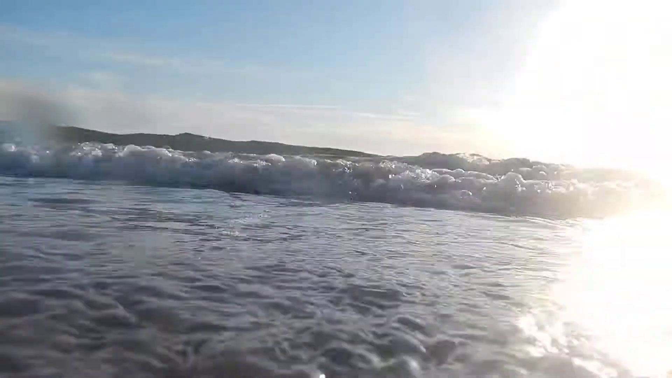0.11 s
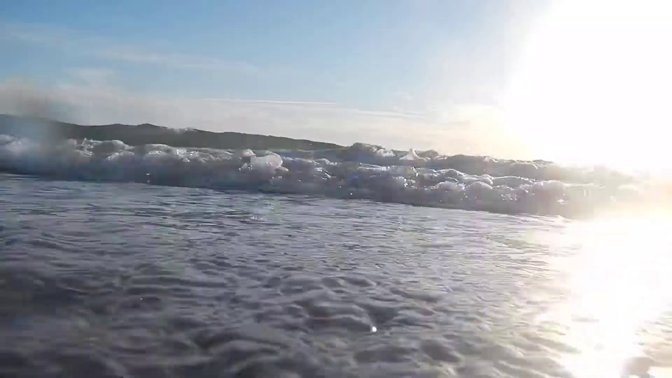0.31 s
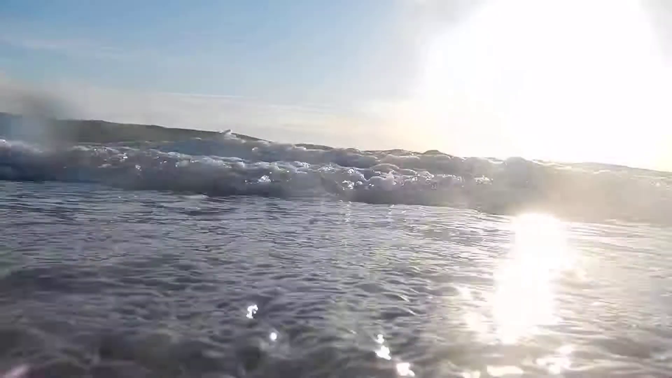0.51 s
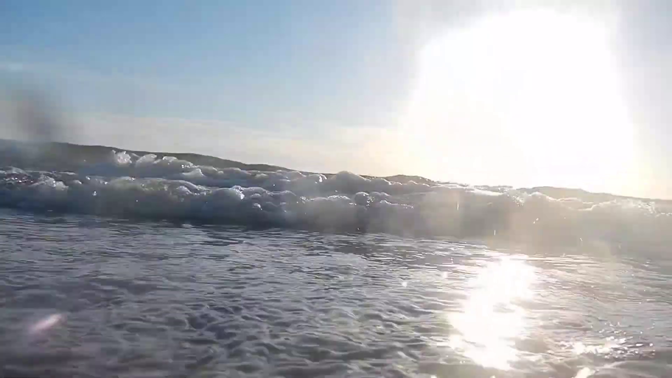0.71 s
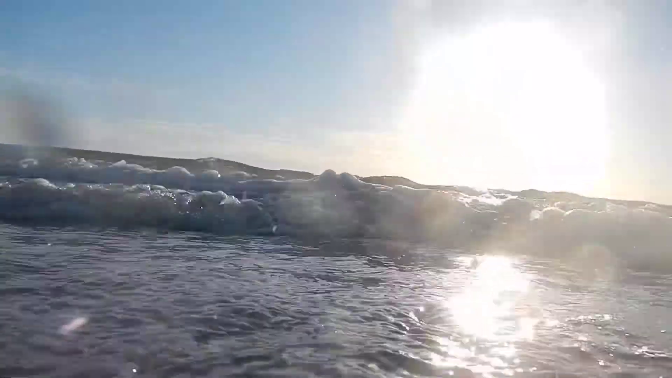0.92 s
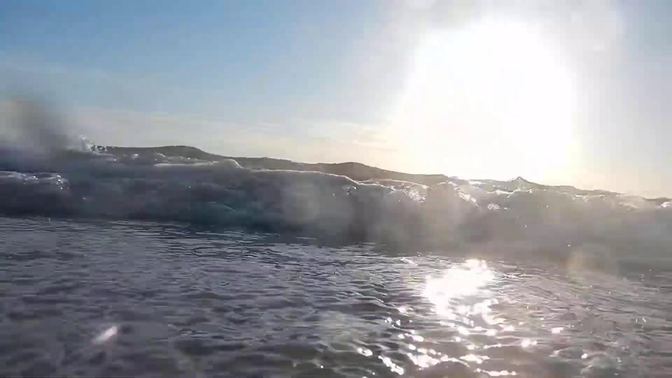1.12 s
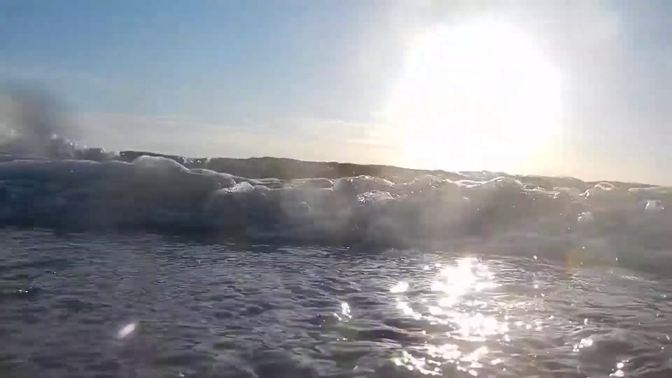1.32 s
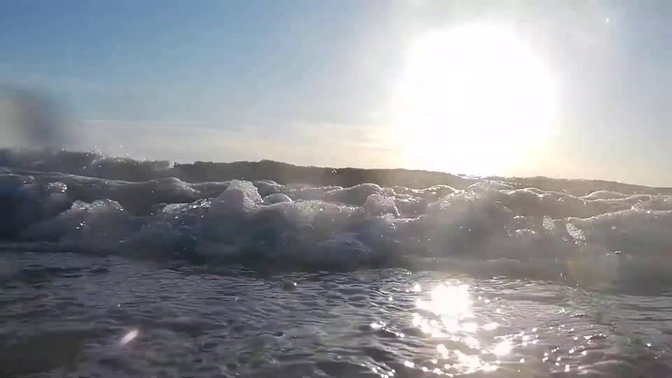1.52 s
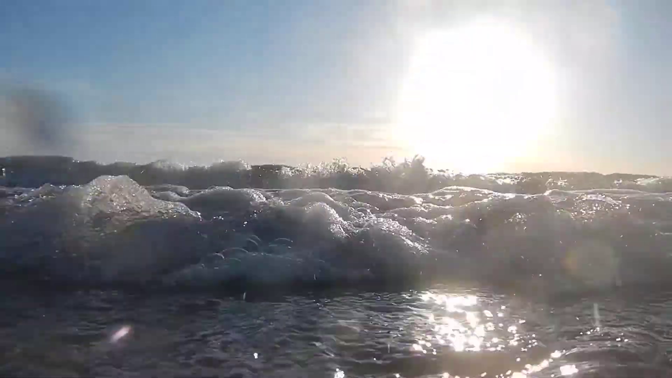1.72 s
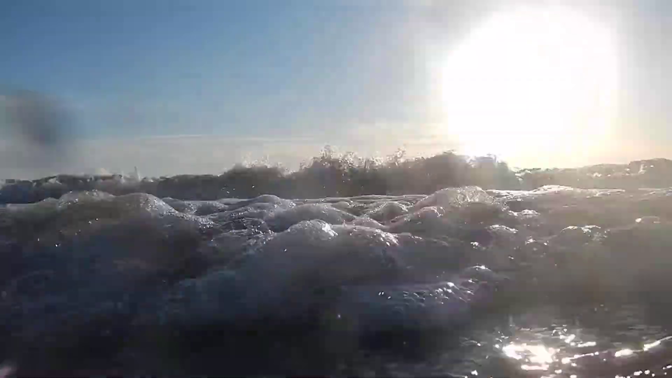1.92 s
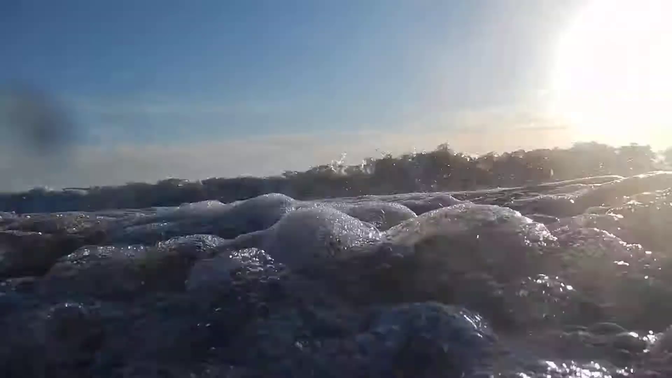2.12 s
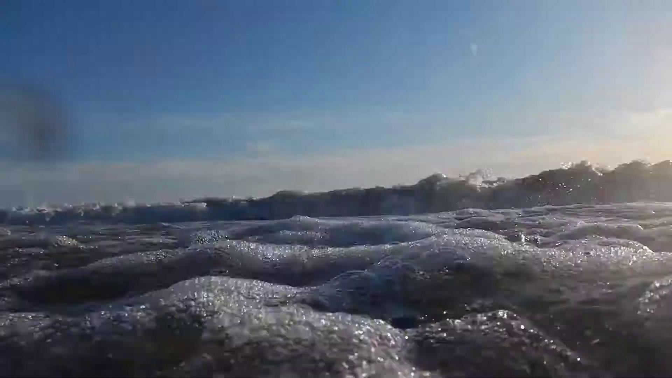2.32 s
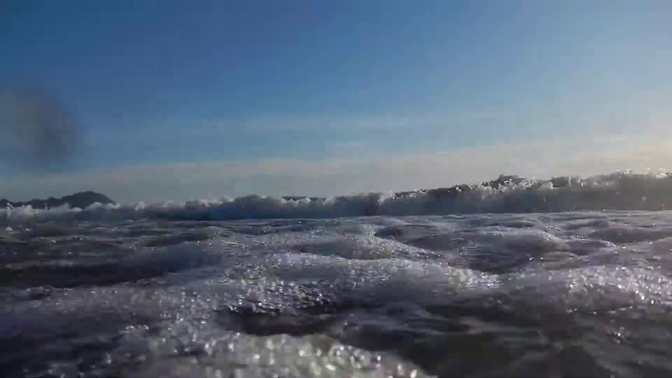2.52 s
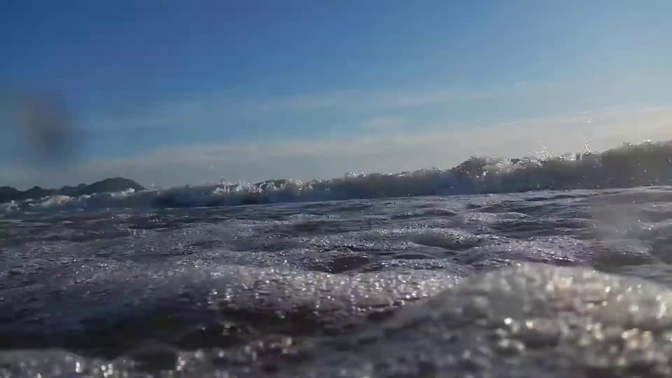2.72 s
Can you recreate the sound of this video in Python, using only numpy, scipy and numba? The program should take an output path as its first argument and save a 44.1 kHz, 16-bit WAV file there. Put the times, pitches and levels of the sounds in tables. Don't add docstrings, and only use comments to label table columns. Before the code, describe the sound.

Foamy wave wash heard up close through a housing, gurgling and popping, then abruptly muffled as water covers it

```python
import sys
import numpy as np
from scipy import signal
from scipy.io import wavfile
from scipy.ndimage import uniform_filter1d
from numba import njit

SR = 44100
rng = np.random.default_rng(int(sys.argv[2]) if len(sys.argv) > 2 else 0)


def transcribe(u):
    v = np.clip(np.atleast_2d(u).T, -1, 1)
    q = np.round(v * 32767).astype(np.int16)
    wavfile.write(sys.argv[1], SR, q)


def field_ratio(decibels):
    return 10 ** (np.asarray(decibels, dtype=float) / 20)


N = 121275
T = np.arange(N) / SR


@njit
def svf(x, hz, width):
    y, band, low = np.empty((2, len(x))), 0., 0.
    for i in range(len(x)):
        g, k = np.tan(np.pi * hz[i] / SR), width[i] / hz[i]
        v = (band + g * (x[i] - low)) / (1 + g * (g + k))
        y[0, i], y[1, i] = k * v, low + g * v
        band, low = 2 * v - band, low + 2 * g * v
    return y


def ring(x, hz, width_hz):
    return svf(x, hz + 0 * T, width_hz + 0 * T)


def fixed(x, hz, width_hz):
    b, a = signal.iirpeak(hz, hz / width_hz, fs=SR)
    return signal.lfilter(b, a, signal.lfilter(b, a, x))


def steep(x, hz, kind):
    return signal.sosfilt(signal.butter(6, hz, kind, fs=SR, output="sos"), x)


def band_noise(x, order, low_hz, high_hz):
    return signal.sosfilt(signal.butter(order, [low_hz, high_hz], "band", fs=SR, output="sos"), x)


def unit(x):
    return x / np.sqrt(np.mean(x ** 2))


def walk(rate):
    k = int(SR / rate)
    steps = np.repeat(rng.standard_normal(N // k + 1), k)
    return unit(uniform_filter1d(uniform_filter1d(steps, k), k)[:N])


def foam(grain_db, flicker_db):
    return unit(rng.standard_normal(N) * field_ratio(grain_db * walk(300) + flicker_db * walk(24.74)))


# t/s, level/dB, right port f/Hz, left port f/Hz, right port ring/dB
WASH_COURSE = [(0, 6, 941, 1406, -1), (.9, 0, 983, 1456, 3.5), (1.02, 0.5, 940, 1355, -0.5),
               (1.12, -1.5, 976, 1436, -1.5), (1.27, -3, 964, 1396, -0.5), (1.32, -0.5, 947, 1400, 1),
               (1.55, 0, 1020, 1370, -2.5), (1.635, -1, 1179, 1390, 3.5), (1.66, 0.5, 1456, 1580, -6),
               (1.9, 0.5, 2140, 1750, 0.5), (2.05, 1.5, 1670, 1750, -7), (2.12, 0.5, 1230, 1610, -8.5),
               (2.33, 2, 1130, 1580, -3), (2.37, 0.5, 1270, 1800, 6.5), (2.42, 1, 1253, 1630, 4),
               (2.5, 2.5, 860, 1310, -8.5), (2.6, 1.5, 770, 1300, -12), (2.75, -4.5, 870, 1200, -7)]


def wash():
    columns = np.array(WASH_COURSE).T
    level_db, right_hz, left_hz, ring_db = (np.interp(T, columns[0], c) for c in columns[1:])
    boost_db, bass_db, treble_db, crackle = sloshes()
    out = ports(right_hz, left_hz, ring_db, bass_db, crackle)
    out = out + shell(left_hz, treble_db, crackle) + rumble(bass_db)
    return out * field_ratio(level_db + boost_db)


# t/s, length/s, boost level/dB, extra bass level/dB, extra treble level/dB
SLOSHES = [(0.634, 0.015, 2, 4.5, 0.5), (0.746, 0.047, 2.5, -9, 1), (1.09, .2, 0.5, 1.5, -1),
           (1.116, .035, 0, 0.5, 7), (0.417, .025, 1.5, -2.5, 5.5), (1.482, 0.081, 2, 1, -3.5),
           (1.618, 0.023, 0, 1, 7.5), (1.643, 0.021, 1.5, 0.5, 16), (2.338, 0.176, -0.5, 2, 9),
           (2.361, .013, 3, -4, 2.5), (2.369, .011, 8, -21, -8), (2.382, 0.0087, 6, -4, -4.5),
           (2.397, 0.023, -3.5, 4, 3), (2.426, 0.032, 2, 3.5, -1.5), (2.461, 0.035, -0.5, 4.5, -4.5),
           (2.524, 0.018, 11.5, 7, -1), (2.656, 0.065, 2.5, 2, -1), (2.692, 0.013, 2.5, 6, 2.5)]


def sloshes():
    shape = [uniform_filter1d(1. * ((T > row[0]) & (T < row[0] + row[1])), size=160) for row in SLOSHES]
    boost_db, bass_db, treble_db = (sum(e * row[k] for e, row in zip(shape, SLOSHES)) for k in (2, 3, 4))
    crackle = field_ratio(1.79 * walk(150) * np.minimum(sum(shape), 1))
    return boost_db, bass_db, treble_db, crackle


APART_DB, CUT_HZ = -6, 373
BODY_HZ, BODY_WIDTH_HZ = 398, 252
LEFT_Q, RIGHT_Q = 7.5, 5.8
LEFT_BODY_DB, LEFT_PORT_DB, RIGHT_DB = -2.5, 3, -7.5
LEAK_TO_LEFT_DB, LEAK_TO_RIGHT_DB = -8.5, -5
TOP_HZ = (1750, 1910)


def ports(right_hz, left_hz, ring_db, bass_db, crackle):
    shared = foam(0.31, 0.32)
    left_in, right_in = (steep(crackle * (shared + field_ratio(APART_DB) * foam(0.4, 0.55)), CUT_HZ, "high")
                         for _ in range(2))
    left_port = ring(left_in, left_hz, left_hz / LEFT_Q)
    right_port = ring(right_in, right_hz, right_hz / RIGHT_Q / field_ratio(ring_db))
    left_body = ring(left_in, BODY_HZ, BODY_WIDTH_HZ)[0]
    right_body = ring(right_in, BODY_HZ, BODY_WIDTH_HZ)[0]

    left = field_ratio(LEFT_BODY_DB + bass_db) * left_body
    left += field_ratio(LEFT_PORT_DB + 0.85 * ring_db) * left_port[0]
    left += field_ratio(LEAK_TO_LEFT_DB + ring_db) * right_port[0]
    right = field_ratio(RIGHT_DB) * (right_port[1] + field_ratio(bass_db) * right_body)
    right += field_ratio(LEAK_TO_RIGHT_DB) * left_port[0]

    edge = [ring(x, hz * np.maximum(left_hz / 1450, 1), 1.636 * hz)[1] for x, hz in zip((left, right), TOP_HZ)]
    return steep(np.array(edge), 1742, "low") * field_ratio(11)


# f/Hz, width f/Hz, left level/dB, right level/dB
SHELL_MODES = [
    (2630, 340, -26, -23),
    (3000, 591, -25, -34),
    (3700, 440, -25.5, -33),
    (5160, 830, -37, -40.5),
    (5730, 1200, -43.5, -43),
    (9430, 4800, -57, -55.5),
]
DUNK_S, DUNK_DB_PER_KHZ = 1.645, -2.4


def shell(left_hz, treble_db, crackle):
    out = np.zeros((2, N))
    muffle_db = 13 * np.log2(np.minimum(left_hz / 1450, 1)) + treble_db
    for hz, width_hz, *side_db in SHELL_MODES:
        dunk_db = DUNK_DB_PER_KHZ * (T > DUNK_S) * np.clip(hz - 2900, 0, 2600) / 1000
        fizz = rng.standard_normal((2, N)) * field_ratio(0.69 * walk(39.71) + dunk_db + muffle_db) * crackle
        fizz[1] -= 0.24 * fizz[0]
        out += field_ratio(np.array(side_db)[:, None] + 11.5) * fixed(fizz, hz, 1.47 * width_hz)
    return out


RUMBLE_HZ, RUMBLE_DB = (62.5, 125, 224), (-25, -19.5, -25)


def rumble(bass_db):
    out = np.zeros((2, N))
    for hz, level_db in zip(RUMBLE_HZ, RUMBLE_DB):
        low = [unit(fixed(foam(0, 3.1), hz, hz * 0.95)) for _ in range(3)]
        out += field_ratio(level_db + bass_db) * (low[0] + field_ratio(-10) * np.array(low[1:]))
    return out


def add(out, s, x, db, pan_db):
    i = int(s * SR)
    side_gain = field_ratio(db + np.array([[pan_db / 2], [-pan_db / 2]]))
    out[:, i:i + x.shape[1]] += (x / np.abs(x).max() * side_gain)[:, :N - i]


# t/s, peak level/dB, f/Hz, ring/ms, left-right
# level/dB
RINGING_BUBBLES = [(0.308, -25, 2680, 2.8, -5.5), (.432, -33, 2810, 3.8, -6),
                   (0.453, -20.5, 1760, 4.7, -13), (0.559, -16.5, 5235, 4.3, -3.5),
                   (.597, -36.5, 7570, 3, 2.5), (0.638, -17, 3220, 10, -4), (0.641, -18.5, 2360, 3.4, -12),
                   (.659, -14.5, 2706, 2.3, 5.5), (.661, -18, 3700, 5.2, 13), (0.693, -5.5, 1782, 5.7, -3),
                   (.730, -26, 5000, 5.3, 1), (.814, -24, 2770, 2.4, 0), (.863, -7.5, 1440, 8.3, 1),
                   (.863, -12, 1010, 10.2, -16), (0.874, -14, 5010, 2.2, 14), (0.874, -19.5, 2740, 3.9, -1),
                   (.855, -29, 8000, 3.3, 8), (.923, -2.5, 1647, 5.3, -2), (1.244, -32, 4970, 4, -8.5),
                   (1.378, -23.5, 2107, 1.5, -4.5), (2.06, -17.5, 1570, 2.6, 18), (2.436, -5, 2760, 3, 0.5),
                   (1.023, -12.5, 930, 10, -15), (1.058, -16, 935, 8, -9), (1.092, -12, 767, 8, -10),
             (1.133, -14.5, 980, 10, -17), (1.161, -14, 955, 7, -16), (1.18, -9, 966, 10, -9),
             (1.201, -10, 835, 9, -16), (1.227, -9, 952, 14, -16.5), (1.276, -11, 1500, 6, -6),
             (1.277, -7.5, 990, 8, -12), (1.288, -10.5, 1546, 6, -0.5), (1.289, -15, 990, 7, -13),
             (1.385, -20.5, 1620, 5, -4), (1.386, -32.5, 2800, 4, -2), (1.452, -20.5, 1680, 4, 5),
             (1.158, -34, 5550, 4, 2), (2.198, -24.5, 1270, 4, 13), (2.361, -27, 3970, 4, 2),
             (2.365, -22.5, 2480, 5, -6), (2.441, -16, 361, 16, -19), (2.44, -22, 176, 28, -13),
             (2.655, -35, 796, 17, 2), (2.453, -36, 3300, 4, -1), (2.467, -33, 845, 6, -3),
             (2.53, -31, 173, 17, -10)]
# t/s, peak level/dB, f/Hz, ring/ms, left-right level/dB
SINKING_PLOPS = [
    (.577, -16.5, 3620, 9.9, 0),
    (.578, -22, 2550, 8, -2),
    (.589, -20, 2570, 7.9, -13.5),
    (.589, -23.5, 3530, 16, 3),
    (.696, -23, 3400, 5.1, 2),
    (.66, -34, 4840, 5, -1),
]
GLIDE, SINK = .02, -0.066
ROUGH, RISE_CYCLES = .55, 1.77


def bubbles():
    out, t = np.zeros((2, N)), T[:4000]
    events = [(row, False) for row in RINGING_BUBBLES] + [(row, True) for row in SINKING_PLOPS]
    for (s, db, hz, ms, pan_db), sinks in events:
        u = t * 1000 / ms
        rise = np.sin(np.pi / 2 * np.minimum(t * hz / RISE_CYCLES, 1)) ** 2
        env = rise * np.exp(-u ** (3.5 if sinks else 1.5) * 1.67)
        bend = SINK * u if sinks else GLIDE * (u - 1)
        side_phase = np.array([[0], [hz / 1900]])
        tone = np.sin(2 * np.pi * hz * t * (1 + bend / 2) + side_phase)
        spray = unit(band_noise(rng.standard_normal((2, len(t))), 4, hz * 0.46, hz * 1.09))
        rough = ROUGH * min(hz / 2500, 1) * spray * np.exp(-u)
        add(out, s, env * (tone + rough), db, pan_db)
    return out


# t/s, peak level/dB, port ring f/Hz, left-right level/dB
PORT_SLAPS = [(.6393, -13, 1300, -10), (1.0425, -15, 950, -0.5), (1.2775, -13.5, 1185, -6),
              (1.29, -24, 1270, -17), (1.6388, -17.5, 1620, 24.5), (2.3721, -18.5, 1470, -19),
              (2.379, -22, 1487, -16), (2.426, -10.5, 1240, -24.5), (2.4344, -19, 2150, 17),
              (2.4891, -15, 1187, -17), (2.5258, -25, 800, -26)]


def slaps():
    out, t = np.zeros((2, N)), T[:4000]
    for s, db, hz, pan_db in PORT_SLAPS:
        rise = np.sin(np.pi / 2 * np.minimum(t * hz * 3, 1)) ** 2
        decay = np.exp(-t * hz)
        add(out, s, -np.sin(2 * np.pi * hz * t)[None] * rise * decay, db, pan_db)
    return out


# t/s, peak level/dB, brightness f/Hz, left-right level/dB
DROP_TICKS = [(.421, -28, 2500, 2), (.453, -38, 6500, 0), (.559, -26, 3000, 0), (.635, -31, 4500, 3),
              (.692, -20, 3200, -4), (.693, -35, 8500, 0), (.855, -34, 5500, 0), (.873, -15, 4200, 0),
              (.874, -31, 7500, 0), (1.132, -27, 8500, 1), (1.133, -30, 4000, 0), (1.232, -31, 6500, 0),
              (1.276, -29, 3500, -5), (1.439, -39, 6800, 0), (1.638, -18, 6000, 3), (1.638, -29, 11000, 0),
              (1.277, -36, 10500, 0), (2.490, -36, 10500, 0), (1.628, -33, 6000, 0), (2.059, -36, 3000, 8),
              (1.659, -46, 7500, 0), (1.668, -50, 6500, 0), (2.196, -37, 4000, 4), (2.342, -32, 5500, 0),
              (2.411, -43, 7000, 0), (2.435, -12, 3000, 3), (2.435, -42, 11000, 0), (2.503, -48, 9000, 0),
              (2.489, -29, 5000, -3), (2.426, -40, 8000, -4), (2.541, -39, 4200, 0), (2.372, -45, 9000, 0)]
TICK_S = .0005


def ticks():
    out, t = np.zeros((2, N)), T[:4000]
    for s, db, hz, pan_db in DROP_TICKS:
        burst = rng.standard_normal((2, len(t))) * (t / TICK_S) * np.exp(-t / TICK_S)
        burst[1] += .5 * burst[0]
        add(out, s, band_noise(burst, 3, hz * .5, hz * 1.27), db, pan_db)
    return out


THUMP_S, THUMP_DB, THUMP_HZ, THUMP_DECAY_S = 2.202, -25.5, 72.6, 0.00615


def thump():
    out, t = np.zeros((2, N)), T[:5000]
    pulse = -np.sin(2 * np.pi * THUMP_HZ * t) * t * np.exp(-t / THUMP_DECAY_S)
    add(out, THUMP_S, pulse[None], THUMP_DB, 13)
    return out


# on t/s, off t/s, level/dB
WHINE_SPANS = [
    (0, 1.625, -55),
    (1.87, 2.38, -62),
]
WHINE_HZ = 14836


def whine():
    level = sum(field_ratio(db) * ((T >= on) & (T < off)) for on, off, db in WHINE_SPANS)
    return level * field_ratio(1.5 * walk(30)) * np.sin(2 * np.pi * WHINE_HZ * T)


# t/s, drop level/dB, recovery after it in dB/s
GAIN_DUCKS = [
    (0, 2, 23.5),
    (0.696, 6, 24.5),
    (1.278, 7.5, -2),
    (1.295, 7, 27),
    (1.641, 20, 17),
    (2.496, 19, 1.5),
    (2.548, 1, 31.5),
]
START_DB, DUCK_S = -34, 0.0026


def gain_db():
    ends = [row[0] for row in GAIN_DUCKS[1:]] + [T[-1]]
    gain = START_DB
    for (s, drop_db, rate), end in zip(GAIN_DUCKS, ends):
        recovery = rate * np.clip(T - s, 0, end - s)
        gain = gain + recovery - drop_db * np.clip((T - s) / DUCK_S, 0, 1)
    return gain


def scene():
    return (wash() + whine()) * field_ratio(gain_db()) + bubbles() + slaps() + ticks() + thump()


QUIET_HZ, QUIET_DB, QUIET_DB_PER_KHZ, FRAME_LEAD = 4700, -98.5, .8, 471


def quiet(x):
    hz, _, z = signal.stft(np.pad(x, ((0, 0), (FRAME_LEAD, 0))), SR, nperseg=2048)
    hz = hz[:, None]
    threshold = field_ratio(QUIET_DB + QUIET_DB_PER_KHZ * (hz - QUIET_HZ) / 1000)
    keep = (np.abs(z) > threshold) | (hz < QUIET_HZ) | (np.abs(hz - WHINE_HZ) < 45)
    return signal.istft(z * keep, SR, nperseg=2048)[1][:, FRAME_LEAD:FRAME_LEAD + N]


def band_limit(x):
    return signal.sosfilt(signal.butter(12, 16470, fs=SR, output="sos"), x)


def record(dry):
    limited = np.tanh(dry * 0.39) / 0.42
    mix = quiet(limited)
    return band_limit(mix)


dry = scene()
out = record(dry)
transcribe(out)
```